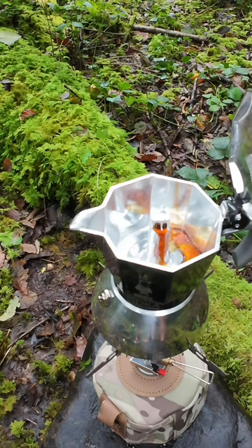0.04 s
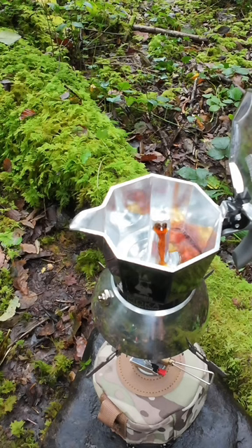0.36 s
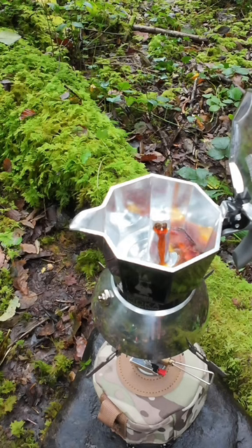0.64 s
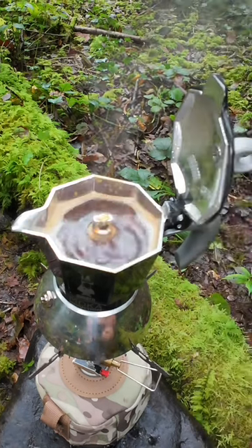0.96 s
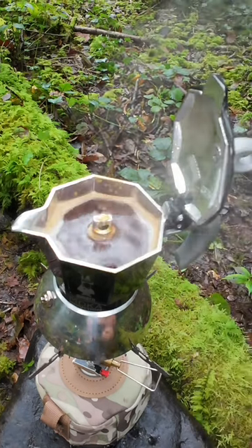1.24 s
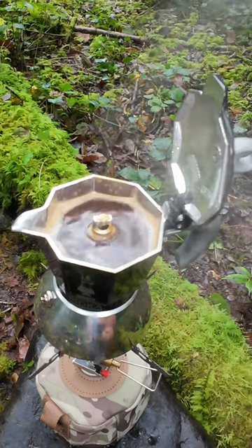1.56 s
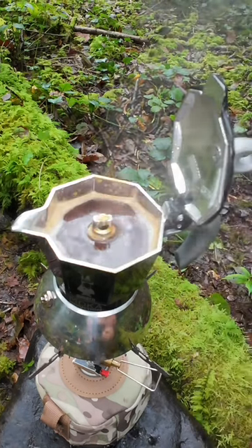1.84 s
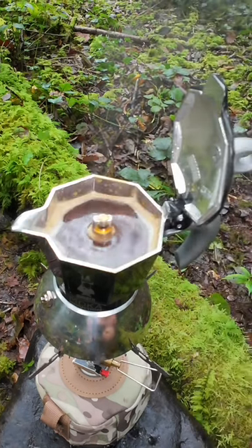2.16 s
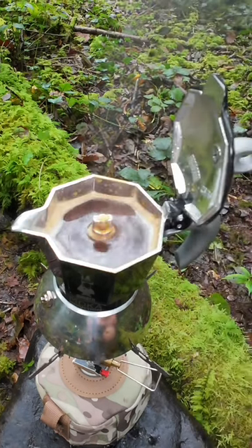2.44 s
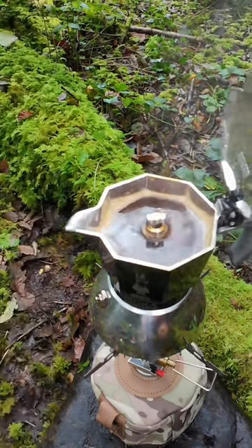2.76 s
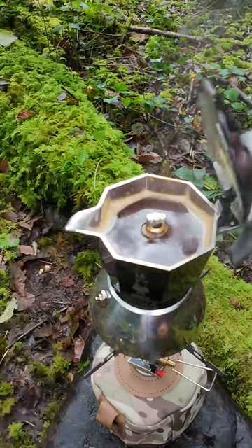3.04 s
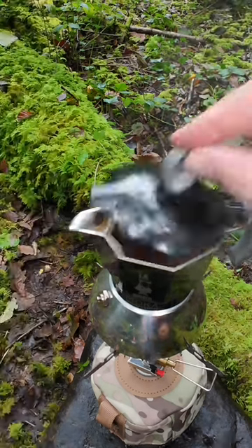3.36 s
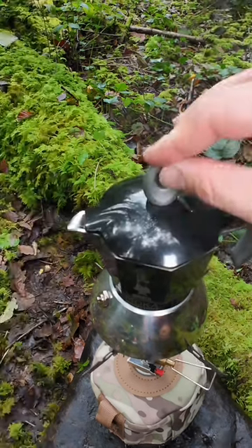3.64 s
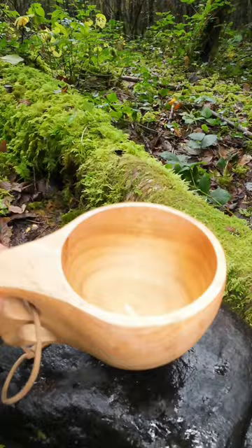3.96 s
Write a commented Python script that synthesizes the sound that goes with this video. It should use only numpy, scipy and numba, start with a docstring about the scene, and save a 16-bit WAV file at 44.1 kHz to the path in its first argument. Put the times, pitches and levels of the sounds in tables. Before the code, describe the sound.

Coffee bubbling and spitting steam in a pot, ending with one loud metal lid clack.

```python
"""In a forest, a coffee pot stands on a gas burner, heard from just above.
At first only the flame rushes. Then the sound cuts abruptly to the already sputtering pot:
steam hisses and spurts from the spout, coffee bubbles burst in the open pot, and droplets tick
on the hot metal. The metal lid is shut with one loud clack, and the pot mutters on beneath it."""
import sys
import numpy as np
from scipy import signal
from scipy.fft import rfft, irfft
from scipy.io import wavfile
from scipy.ndimage import uniform_filter1d, minimum_filter1d, map_coordinates
from numba import njit

SR = 44100
rng = np.random.default_rng(int(sys.argv[2]) if len(sys.argv) > 2 else 0)


def to_wav(s):
    """Save 16-bit WAV."""
    ch = np.atleast_2d(s).T  # columns
    pcm = np.round(np.clip(ch, -1, 1) * 32767)  # PCM
    wavfile.write(sys.argv[1], SR, pcm.astype(np.int16))


N = 176400
CUT_S = .797  # the sound cuts abruptly from the rushing flame to the already sputtering pot
RASP_S, DRY_S, SHUT_S = 2.09, 2.68, 3.492  # the foam rasps; the pot starts to run dry; the lid lands

# Table levels compare the rows with one another; the functions set the final loudness.
# Bubbles bursting in the open pot: t/s, level/dB, brightness/Hz
OPEN_POPS = [(0.8564,-24.5,960), (0.8732,-28.5,910), (0.8833,-26,765), (0.9196,-33,460), (0.9326,-31,720),
             (0.9527,-23,1010), (1.0579,-15,1460), (1.0757,-16,1630), (1.081,-26.5,1360), (1.148,-32,596),
             (1.175,-21.5,730), (1.1889,-31,850), (1.1907,-24,370), (1.2785,-27,906), (1.2844,-26.5,770),
             (1.3878,-30,746), (1.4212,-31.5,1120), (1.4395,-29.5,800), (1.5656,-21.5,1210),
             (1.6633,-27.5,905), (1.6677,-21,1030), (1.7609,-23,940), (1.7775,-33,650), (1.7913,-28.5,790),
             (1.8596,-28.5,1140), (1.8969,-19.5,1520), (1.8998,-29.5,616), (1.9033,-26,890),
             (1.9506,-25.5,510), (1.9809,-30.5,1560), (2.0444,-17.5,1530), (2.0469,-23,1300),
             (2.0548,-20,1897), (2.1393,-22,1340), (2.276,-24,1740), (2.3627,-32.5,634), (2.4691,-20,1260),
             (2.4744,-22,1130), (2.8007,-28,1040), (2.8462,-19,1600), (2.8492,-33,340), (2.9272,-30.5,950),
             (2.9364,-20.5,1370), (3.0488,-29,1300), (3.1835,-24.5,930), (3.3365,-27,1100)]
# Bubbles bursting under the lid: t/s, level/dB, brightness/Hz
COVERED_PLOPS = [(3.623, -41.5, 597), (3.690, -34.5, 537), (3.733, -38, 520), (3.751, -35, 520),
                 (3.776, -38, 406), (3.785, -40, 330), (3.816, -38, 477), (3.829, -37, 500),
                 (3.861, -34.5, 620), (3.872, -44, 560), (3.964, -35, 690)]
# Bigger bubbles that ring briefly as they burst: t/s, level/dB, starting f/Hz
GLUGS = [(.857, -40, 676), (.883, -38, 565), (.921, -44, 360), (1.667, -38, 402), (1.761, -35.5, 564),
         (1.951, -35, 600), (2.469, -35.5, 1095), (3.688, -43.5, 540), (3.745, -40, 580)]
# Strength of the steam rushing through the foam: t/s, level/dB
FLOW_LEVELS = [(.8, -45), (.83, -45.5), (.92, -48.5), (1.1, -51), (1.55, -49), (1.65, -48.5), (1.98, -49),
               (2.2, -49.5), (2.62, -48), (2.72, -51.5), (3.25, -51), (3.45, -54), (3.55, -62)]
# Tone of that rush, from bass to treble: f/Hz, level/dB
FLOW_COLOUR = [(150, -1), (400, 7), (750, 0), (1500, 4), (2600, 1.5), (4000, -1), (4900, -2.5), (5800, -3),
               (9000, -11), (15500, -14)]
# Moving pitches of the steam: t/s, hiss f/Hz, foam f/Hz
STEAM_PITCHES = [(.82, 9980, 3560), (.98, 10300, 3050), (1.04, 7960, 2740), (1.92, 7500, 2700),
                 (2.12, 9200, 3200), (2.3, 10300, 3180), (2.65, 8000, 3400), (2.74, 7800, 2790),
                 (3.0, 9090, 3440), (3.43, 7400, 2180)]
# Spurts of steam: middle t/s, length/s, hiss level/dB, sizzle level/dB
SPURTS = [(0.84, 0.0503, -50.5, -50.5), (0.897, 0.027, -47.5, -52), (1.009, 0.076, -48, -48),
          (1.106, 0.064, -47.5, -51), (1.173, 0.014, -43.5, -47.5), (1.233, 0.071, -47, -63),
          (1.344, 0.057, -41.5, -43), (1.481, 0.026, -51, -49), (1.521, 0.029, -47, -43),
          (1.598, 0.033, -43.5, -51), (1.641, 0.021, -48.5, -45), (1.737, 0.082, -49.5, -48.5),
          (1.828, 0.059, -48, -48), (1.915, 0.012, -45.5, -67.5), (1.962, 0.0464, -49.5, -58),
          (2.028, 0.0234, -45, -46), (2.087, 0.052, -43.5, -48), (2.193, 0.0493, -43.5, -50),
          (2.28, 0.238, -47, -54), (2.393, 0.042, -42.5, -47), (2.46, 0.0134, -63, -40),
          (2.51, 0.08, -49.5, -49.5), (2.584, 0.023, -41.5, -49), (2.645, 0.028, -44.5, -48.5),
          (2.677, 0.013, -47.5, -43.5), (2.725, 0.016, -41, -49), (2.751, 0.0265, -43, -57.5),
          (2.793, 0.0088, -39, -41), (2.826, 0.0176, -55.5, -45.5), (2.889, 0.042, -43.5, -48),
          (2.974, 0.014, -36.5, -40), (3.021, 0.02, -47, -41), (3.064, 0.0115, -42.5, -40),
          (3.101, 0.018, -49, -45), (3.303, 0.033, -65, -45), (3.443, 0.13, -49.5, -60),
          (3.915, 0.063, -60, -52.5)]
# Short, thin spits as the pot runs dry: middle t/s, sizzle level/dB
SPITS = [(2.92, -44), (2.982, -42), (3.026, -44), (3.138, -38.5), (3.156, -42.5), (3.332, -47), (3.38, -47),
         (3.405, -47), (3.433, -45), (3.465, -51), (3.673, -47), (3.715, -56), (3.737, -56), (3.755, -53),
         (3.905, -45.5), (3.963, -49), (3.994, -55)]
# Thin squeaks of steam and ringing bubbles: middle t/s, length/s, f/Hz, pitch wobble/Hz, level/dB
SQUEAKS = [(1.97, 0.0041, 5940, 500, -36), (2.013, 0.015, 6060, 450, -37.5),
           (2.0545, 0.00063, 1980, 151.8, -20.5), (3.433, 0.013, 6773, 990, -44.5),
           (3.872, .012, 4550, 350, -53.5)]
# The lid hitting the rim: t/s, level/dB, contact length/s
CLACKS = [(3.4920, 2, .002), (3.4940, -5, .0014), (3.4969, -1.5, .0007), (3.5001, -11, .0006),
          (3.5019, -16, .0007)]
# Ringing notes of lid and pot: f/Hz, level/dB, fade time/s
METAL_NOTES = [(399, -4.5, .01), (618.2, -0.5, 0.032), (691.3, -4.5, 0.027), (888, -3.5, .015),
               (1805, -2, 0.015), (2396, 1.5, 0.01), (3285, -5, 0.018), (5510, 2, 0.017), (7200, 7, 0.009),
               (8250, 2, .008), (9170, -1, 0.011), (11840, -7, 0.009), (12700, -4, .011), (13485, -1, 0.01)]
# Tone of the crack of metal on metal: f/Hz, level/dB
CRACK_COLOUR = [(200, -12), (450, 5), (1000, 5), (1400, 1.5), (2000, 5.5), (4000, 5.5), (6000, 4.5),
                (7500, 9), (11000, 3), (13000, 6.5), (15500, 3)]
# Tone of the gas flame: f/Hz, level/dB
FLAME_COLOUR = [(25, -2.5), (100, -4), (250, -6), (400, -2), (600, -9), (1000, -9), (1500, -15),
                (3700, -19.5), (9000, -24), (15500, -29.5)]
# Tone of the simmering water: f/Hz, level/dB
SIMMER_COLOUR = [(25, 3.5), (70, -6), (200, -10.5), (400, -17), (680, 1), (1000, -6.5), (1500, -16),
                 (4000, -18.5), (9000, -19), (15500, -22.5)]


def bubbling(t):
    """Big bubbles burst over a patter of small ones; foam dulls them and the shut lid muffles them."""
    small_per_s, small_db, small_hz = 50, -42, 715
    chance = rng.standard_normal((400, 2))
    times = CUT_S + np.cumsum(rng.exponential(1 / small_per_s, len(chance)))
    patter = pops([(s, small_db + 2 * min(strength, 2), small_hz * np.exp(.295 * pitch))
                   for s, (strength, pitch) in zip(times, chance) if s < t[-1]])
    open_pot = pops(OPEN_POPS) + patter * (t < SHUT_S)
    covered_pot = undb(1) * pops(COVERED_PLOPS) + patter * (t >= SHUT_S)
    return low_pass(open_pot, hz=4200, order=5) + low_pass(covered_pot, hz=1200, order=3)


def pops(rows):
    """Each burst is a snap of pressure with a short ring; bigger bubbles sound lower and rounder."""
    out, size = np.zeros(N + 2048), 1024
    t = (np.arange(size) - size // 4) / SR
    f = np.fft.rfftfreq(size, 1 / SR)
    for s, db, hz in rows:
        smallness = hz / 1040
        snap_s, damping = .000085 / smallness, smallness ** .77 / 1.4
        ring_hz, body_hz = 577 * smallness ** .44, 313 * smallness ** .28
        snap = np.exp(-np.hypot(t / snap_s, .6))
        ring = resonance(f, ring_hz, damping)
        body = undb(3.5) * resonance(f, body_hz, damping=1)
        pop = irfft(rfft(snap) * (ring + body))
        peak = np.abs(signal.hilbert(pop)).max()
        i = int(np.clip(s * SR, 0, N - 1))
        out[i:i + size] += undb(db) * pop / peak
    return out[size // 4:][:N]


def glugs(t):
    """A bigger bubble rings briefly as it bursts, rising in pitch."""
    out, size, rise_per_s = np.zeros(N), 2048, 6
    age = t[:size]
    for s, db, hz in GLUGS:
        i = int(s * SR)
        cycles = hz * age * (1 + rise_per_s * age / 2)
        out[i:i + size] += undb(db) * fade(age, t60=.03) * np.sin(2 * np.pi * cycles)
    return out


def steam(t):
    """Steam rushes through the foam, rasps late in the full boil, and spurts with hiss and sizzle."""
    times, hiss_hz, foam_hz = np.array(STEAM_PITCHES).T
    flow = foam_rush(t, np.interp(t, times, foam_hz))
    rasping = uniform_filter1d(1. * ((t > RASP_S) & (t < DRY_S)), size=1500)
    rasp = undb(-54.5) * rasping * band(4170 * (1 + .043 * wander(9.8)), width_hz=1100)
    hiss_gain, sizzle_gain = spurt_strengths(t)
    hiss_centre = np.interp(t, times, hiss_hz) * (1 + .055 * wander(45))
    hiss = undb(-4) * hiss_gain * band(hiss_centre, width_hz=4000)
    sizzle_gain *= undb(-4 + 4.7 * wander(77))
    sizzle = sizzle_gain * band(14390 * (1 + .045 * wander(66)), width_hz=2400)
    return flow + squeaks(t) + (hiss + sizzle + rasp) * undb(2 * wander(110))


def foam_rush(t, foam_hz):
    """Steam pushing through foam makes a broad, fluttering rush with a drifting pitch."""
    broad = noise(FLOW_COLOUR)
    foam = undb(-4.5 + 1.4 * wander(22.5)) * band(foam_hz * np.exp(.09 * wander(12)), width_hz=2400)
    level_db = np.interp(t, *np.array(FLOW_LEVELS).T) + 1.1 * wander(25.15) + 2.926 * wander(400)
    return undb(level_db) * unit(broad + foam)


def spurt_strengths(t):
    """Each spurt or spit swells the hiss and sizzle; a steady sizzle stops as the pot starts to dry."""
    spits = [(s, .0097, db - 9, db) for s, db in SPITS]  # same columns as SPURTS
    hiss_power, sizzle_power = 0, (t < DRY_S) * undb(-54) ** 2
    for s, length, hiss_db, sizzle_db in list(SPURTS) + spits:
        shape = swell(t, s, length)
        hiss_power += (shape * undb(hiss_db)) ** 2
        sizzle_power += (shape * undb(sizzle_db)) ** 2
    return np.sqrt(hiss_power), np.sqrt(sizzle_power)


def squeaks(t):
    """Steam and ringing bubbles give brief, thin notes with a shaky pitch."""
    out = np.zeros(N)
    for s, length, hz, wobble_hz, db in SQUEAKS:
        cycles = np.cumsum(hz + wobble_hz / 2 * wander(2 * wobble_hz)) / SR
        out += undb(db) * swell(t, s, length) * np.sqrt(2) * np.sin(2 * np.pi * cycles)
    return out


def spout(x):
    """An upside-down echo inside the spout weakens some pitches, so the hiss sounds hollow."""
    echo_s, echo_gain = .000174, .48
    f = np.fft.rfftfreq(N, 1 / SR)
    echo = echo_gain * np.exp(-2j * np.pi * f * echo_s)
    return irfft(rfft(x) * (1 - echo) / (1 + echo_gain), N)


def lid(t):
    """The hand-held lid chatters on the rim: each hit cracks and rings; the bushes echo faintly."""
    out, size = np.zeros(N), 8192
    age, grit = t[:size], noise(CRACK_COLOUR)
    phases = rng.uniform(0, 2 * np.pi, len(METAL_NOTES))
    for s, db, length in CLACKS:
        i = int(s * SR)
        ring = sum(undb(note_db) * fade(age, t60) * np.sin(2 * np.pi * hz * (age + s) + phase)
                   for (hz, note_db, t60), phase in zip(METAL_NOTES, phases))
        crack = grit[i:i + size] * (np.exp(-age / length) + .26 * fade(age, t60=.012))
        out[i:i + size] += undb(db) * (undb(-15) * ring + crack)
    forest_echo = undb(-43.5) * noise(CRACK_COLOUR) * fade(t - SHUT_S, t60=.55)
    return high_pass(out + forest_echo, hz=350, order=4)


def droplets(t):
    """Tiny droplets spit on the hot metal as dry, high ticks."""
    out, size, ticks_per_s = np.zeros(N + 1024), 1024, 76
    age = t[:size]
    chance = rng.uniform(1e-6, 1, (900, 3))
    times = CUT_S + np.cumsum(-np.log(chance[:, 0])) / ticks_per_s
    for s, (_, pitch, strength) in zip(times[times < t[-1]], chance):
        i = int(s * SR)
        db, hz = -44.5 + 10 * strength ** 3, 6500 + 9000 * pitch
        out[i:i + size] += undb(db) * fade(age, t60=.003) * np.sin(2 * np.pi * hz * age)
    return out[:N]


def simmer(t):
    """The water gurgles low in the pot, a little louder once the lid is shut."""
    return noise(SIMMER_COLOUR) * undb(-54 + 1.5 * (t > SHUT_S) + 2.4 * wander(98))


def flame():
    """The gas flame rushes, and its jet whistles faintly."""
    rush = noise(FLAME_COLOUR) * undb(-51.5 + .55 * wander(40.4))
    whistle = undb(-69.5) * band(3757, width_hz=290)
    return rush + whistle


def undb(db):
    """Turn decibels into a number to multiply by."""
    return 10 ** (np.asarray(db) / 20)


def unit(x):
    """Scale a signal to an average strength (rms) of one."""
    return x / np.sqrt(np.mean(x ** 2))


def noise(colour):
    """Noise whose tone follows a table of f/Hz, level/dB."""
    hz, db = np.array(colour).T
    f = np.maximum(np.fft.rfftfreq(N, 1 / SR), 1)
    gain = undb(np.interp(np.log(f), np.log(hz), db))
    return unit(irfft(rfft(rng.standard_normal(N)) * gain, N))


def wander(steps_per_s):
    """A smooth random drift, about one unit either way."""
    steps = rng.standard_normal(4096)
    return unit(map_coordinates(steps, [np.arange(N) / SR * steps_per_s], order=3, mode="wrap"))


def band(hz, width_hz):
    """Noise gathered around one pitch, which may move."""
    hz, width_hz = hz * np.ones(N), float(width_hz)
    once = band_pass(rng.standard_normal(N), hz, width_hz)
    return unit(band_pass(once, hz, width_hz))


@njit
def band_pass(x, hz, width_hz):
    """Keep only the sound near a moving pitch."""
    out, band_state, low_state = np.empty(len(x)), 0., 0.
    for i in range(len(x)):
        angle = np.pi * min(hz[i], .45 * SR) / SR
        tuning = np.tan(angle)
        damping = 2 * np.pi * width_hz / SR / np.sin(2 * angle)
        swing = (band_state + tuning * (x[i] - low_state)) / (1 + tuning * (tuning + damping))
        band_state = 2 * swing - band_state
        low_state += 2 * tuning * swing
        out[i] = damping * swing
    return out


def resonance(f, hz, damping):
    """A filter curve that drops the bass and rings near hz; more damping means less ring."""
    ratio = 1j * f / hz
    return ratio ** 2 / (ratio ** 2 + damping * ratio + 1)


def fade(t, t60):
    """Start at time zero and die away by 60 dB every t60 seconds."""
    return (t >= 0) * np.exp(-np.log(1000) * np.maximum(t, 0) / t60)


def swell(t, middle, length):
    """A bell-shaped rise and fall."""
    return np.exp(-2 * np.minimum(((t - middle) / length) ** 2, 20))


def low_pass(x, hz, order):
    """Remove the treble."""
    return signal.sosfilt(signal.butter(order, hz, fs=SR, output="sos"), x)


def high_pass(x, hz, order):
    """Remove the bass."""
    return signal.sosfilt(signal.butter(order, hz, "high", fs=SR, output="sos"), x)


def scene():
    """The sound cuts abruptly from the flame to the already sputtering pot; later the lid shuts."""
    t = np.arange(N) / SR
    after_cut = np.clip((t - CUT_S) / .0012, 0, 1)
    background = (1 - after_cut) * flame() + after_cut * simmer(t)
    hissing = after_cut * spout(steam(t) + droplets(t))
    return (bubbling(t) + glugs(t) + hissing + lid(t) + background)[None]


def record(dry):
    """A fast limiter turns down the loud clack; then the deep bass and the highest treble are cut."""
    ceiling, window, top_hz = 1.15, int(.0007 * SR), 15900
    needed_gain = ceiling / np.maximum(np.abs(dry), ceiling)
    smooth_gain = uniform_filter1d(minimum_filter1d(needed_gain, window), window)
    thinned = high_pass(dry * smooth_gain, hz=74, order=2)
    return signal.sosfilt(signal.ellip(10, .1, 70, top_hz, fs=SR, output="sos"), thinned)


dry = scene()
out = record(dry)
to_wav(out)
```